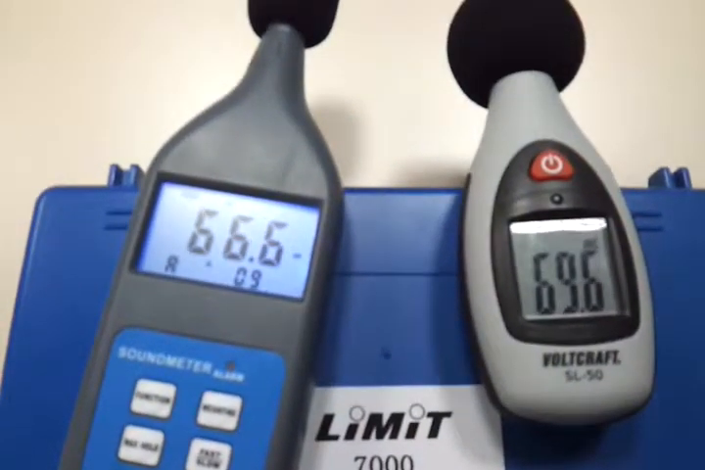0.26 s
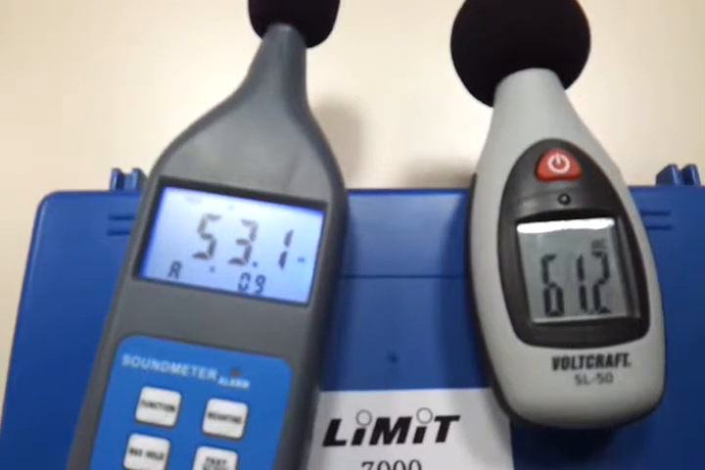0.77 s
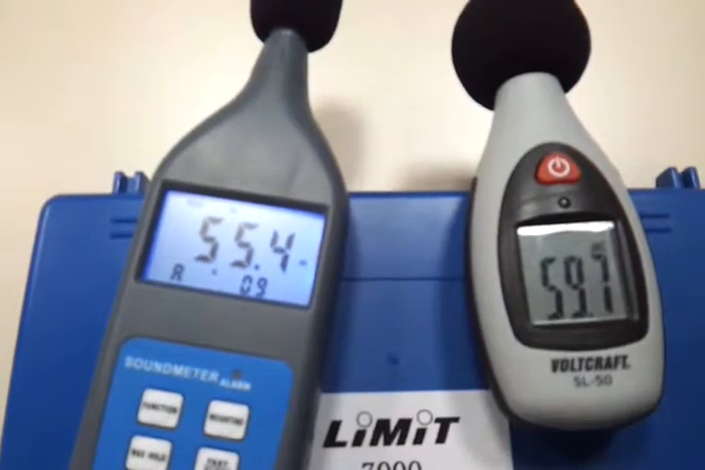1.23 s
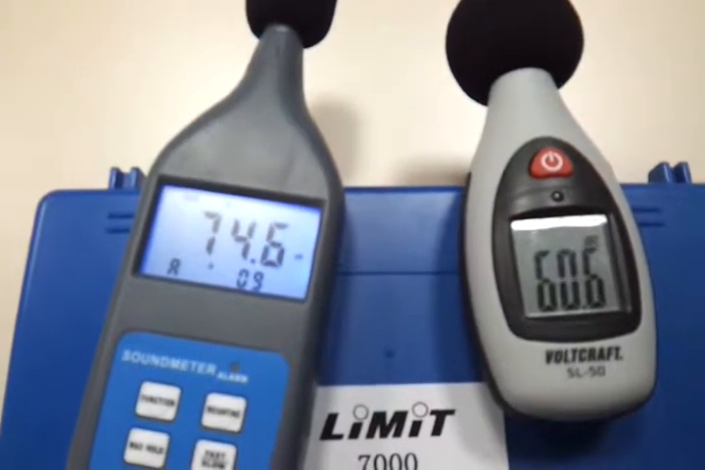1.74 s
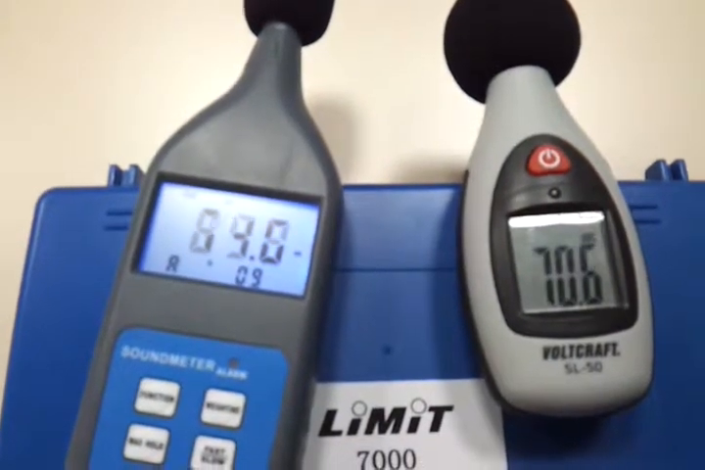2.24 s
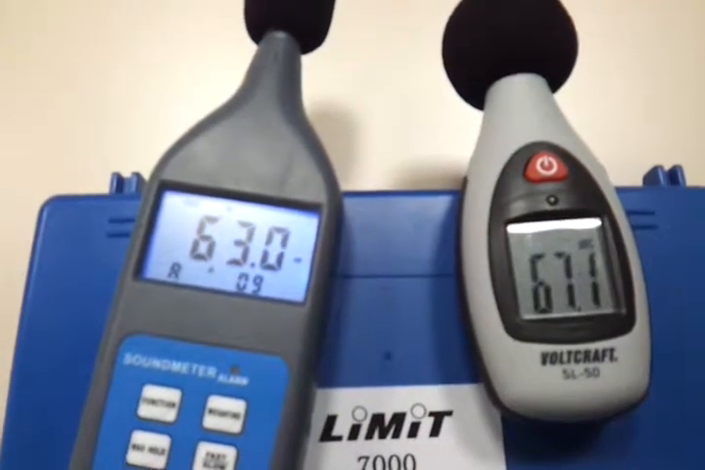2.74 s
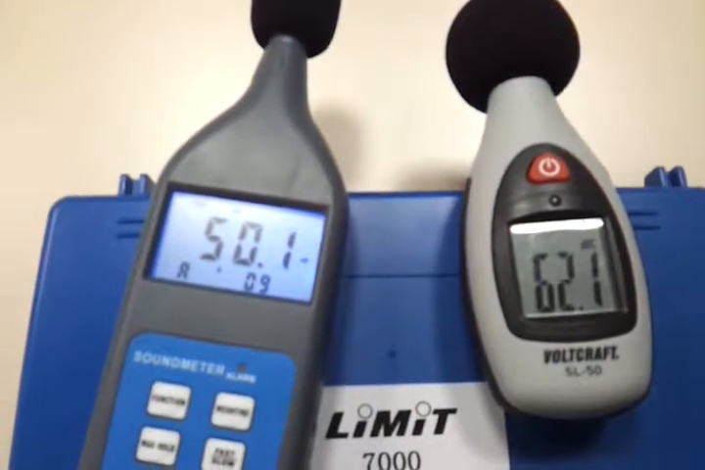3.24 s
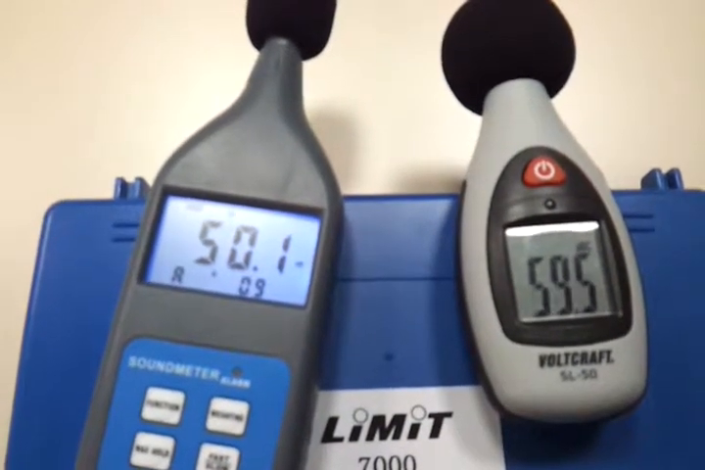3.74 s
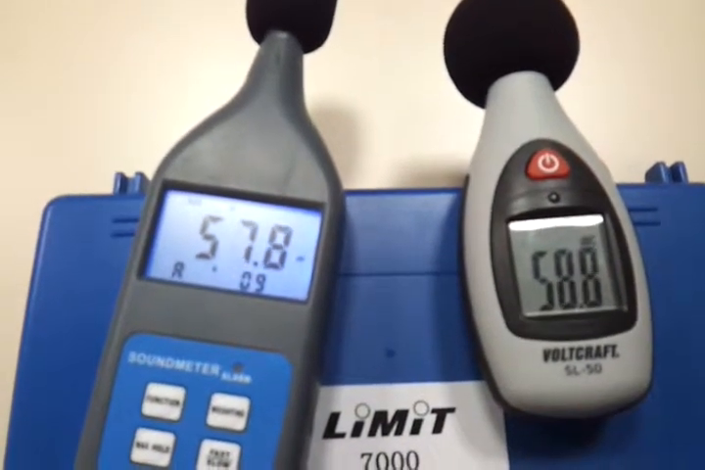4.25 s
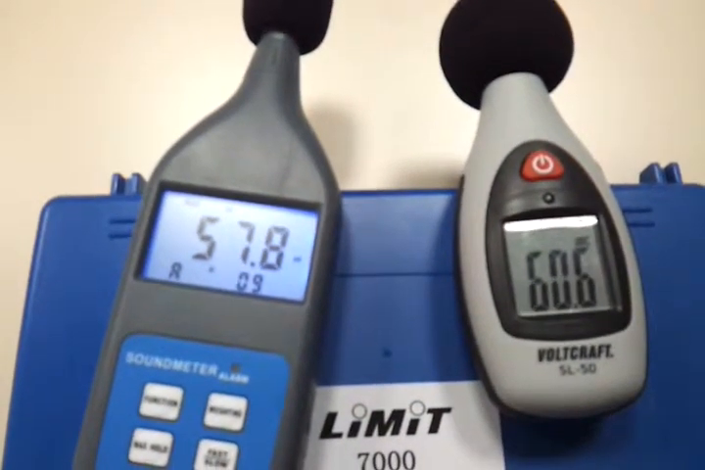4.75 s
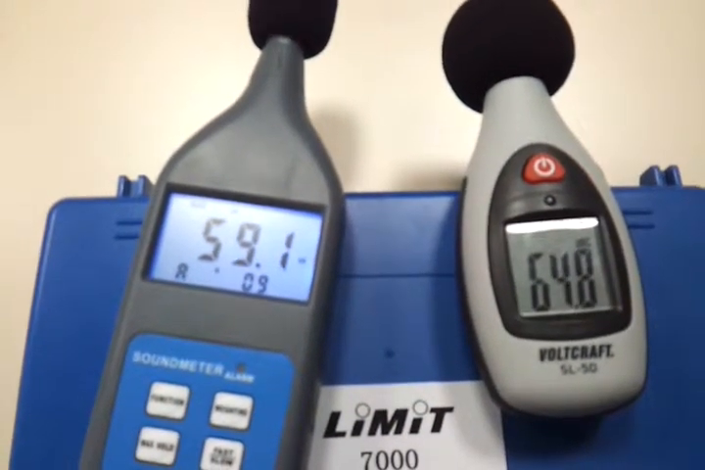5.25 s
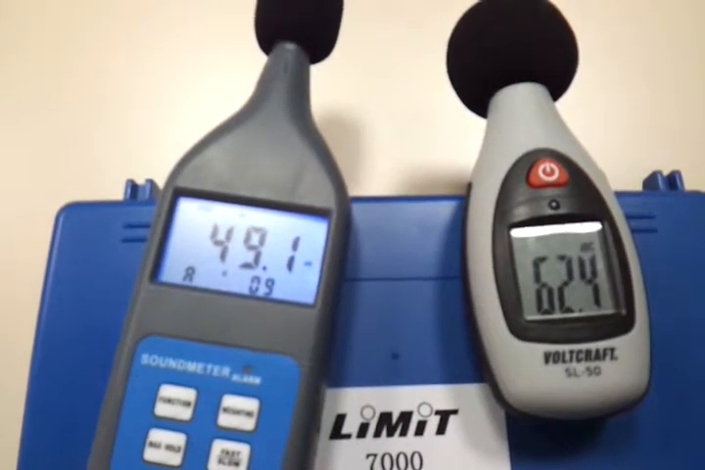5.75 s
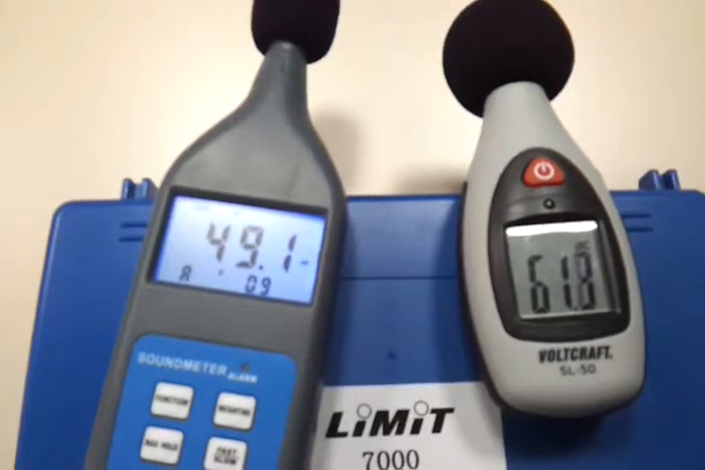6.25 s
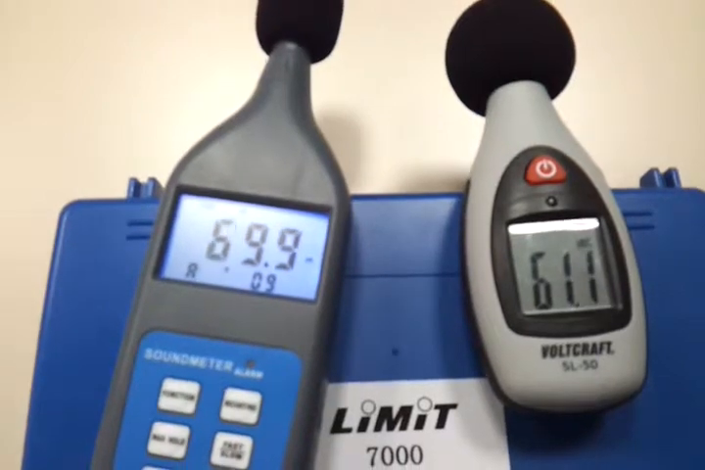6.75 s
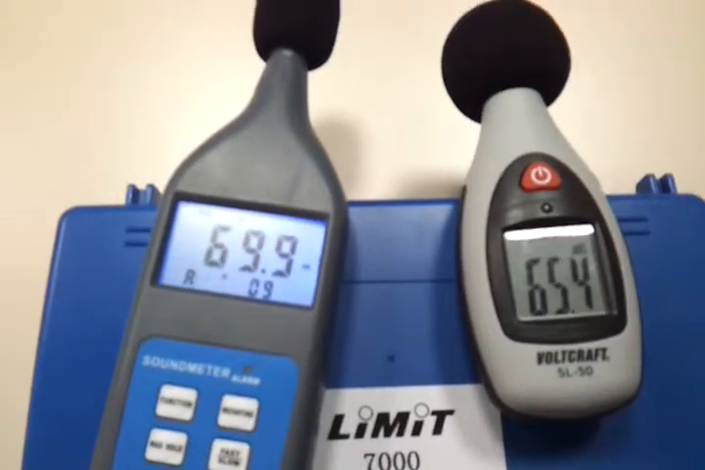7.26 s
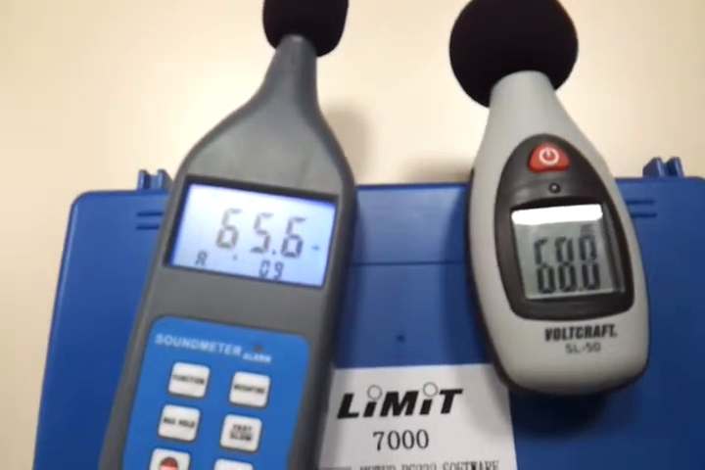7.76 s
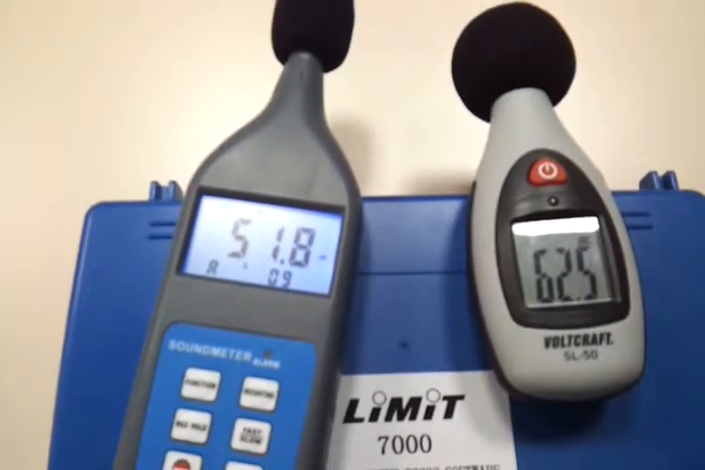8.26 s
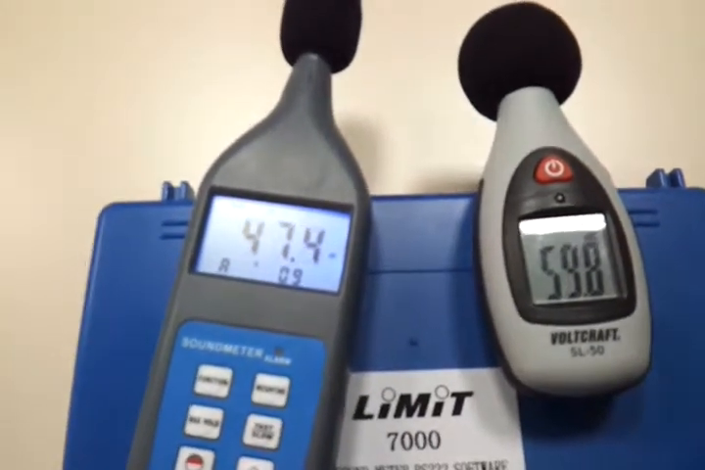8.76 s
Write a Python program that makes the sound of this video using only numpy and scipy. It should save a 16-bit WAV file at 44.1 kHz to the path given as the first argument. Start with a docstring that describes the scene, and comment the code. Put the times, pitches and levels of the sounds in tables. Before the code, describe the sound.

Short crackling rips of a paper sheet, sharp flicks and faint handling rustle, a couple of table knocks, over low steady indoor rumble.

```python
"""A small, lively room with a low, nearly steady rumble, where paper is ripped close by in four quick tears.
Tears are dense crackles of breaking fibres that also drive the rasp and flutter of the sheet.
Around them noise bursts make the sheet snap, and swells of grainy hiss make it rustle in the hands.
Before the last tear two knocks ring the table with decaying sines; taps, clicks and thumps are shaped noise.
The loudest peaks are rounded off a little."""
import sys
import numpy as np
from scipy import signal
from scipy.fft import rfft, irfft, next_fast_len
from scipy.io import wavfile
from scipy.ndimage import map_coordinates

SR = 44100
rng = np.random.default_rng(int(sys.argv[2]) if len(sys.argv) > 2 else 0)


def inscribe(sig):
    """Save sig as 16-bit PCM at rate SR to the path in sys.argv[1].

    A 1-D sig is mono; a 2-D sig holds one channel per row.
    Samples are clipped to [-1, 1] before scaling.
    """
    pcm = np.round(np.clip(np.atleast_2d(sig).T, -1, 1) * 32767)
    wavfile.write(sys.argv[1], SR, pcm.astype(np.int16))


N = 396900


def amp(db):
    """Decibels to gain."""
    return 10 ** (np.asarray(db) / 20)


def unit(x):
    """Scale to rms 1."""
    return x / np.sqrt(np.mean(x ** 2) + 1e-20)


def along(points, hz):
    """Interpolate (Hz, value) points on a log frequency axis."""
    f, v = np.transpose(points)
    return np.interp(np.log(hz + 1), np.log(f + 1), v)


def wobble(rate, n):
    """A smooth random curve, rate knots a second."""
    return map_coordinates(rng.standard_normal(int(n * rate / SR) + 4), [np.arange(n) * rate / SR])


def filtered(x, response):
    """Multiply the spectrum of x by a response of frequency."""
    n = x.shape[-1]
    m = next_fast_len(n + 8192)
    return irfft(rfft(x, m) * response(np.fft.rfftfreq(m, 1 / SR)), m)[..., :n]


def coloured(x, spectrum, size=2048):
    """Colour x with a minimum-phase filter of energy 1, so that sharp onsets stay sharp."""
    log_gain = np.log(amp(along(spectrum, np.fft.rfftfreq(size, 1 / SR))))
    # folding the cepstrum forward in time makes the filter causal
    cepstrum = irfft(log_gain)
    cepstrum[1:size // 2] *= 2
    cepstrum[size // 2 + 1:] = 0
    kernel = irfft(np.exp(rfft(cepstrum)))
    return signal.fftconvolve(x, kernel[None] / np.linalg.norm(kernel), axes=1)[:, :x.shape[1]]


# How alike the two microphones hear diffuse sound. Each row: frequency in Hz, left-right correlation.
LIKENESS = [(40, 0.88), (140, 0.9), (350, 0.79), (700, 0.74), (1200, -0.26), (2200, -0.19), (4000, 0.35),
            (12000, -0.17)]


def pair(n):
    """White noise at two spaced microphones: alike in the bass, only loosely related in the treble."""
    def turn(hz):
        return np.arccos(np.clip(along(LIKENESS, hz), -1, 1)) / 2

    def mid_side_gains(hz):
        return np.array([np.cos(turn(hz)), np.sin(turn(hz))])

    mid, side = filtered(rng.standard_normal((2, n)), mid_side_gains)
    return np.array([mid + side, mid - side])


def spaced(n, lead):
    """White noise from one direction: it reaches the left microphone lead seconds before the right."""
    ears = np.array([[1], [-1]])
    return filtered(rng.standard_normal(n), lambda hz: np.exp(1j * np.pi * hz * lead * ears))


def crackle(n, rate, spread_db, life):
    """Envelope of tiny uneven bursts at random moments, rate a second, each dying in life seconds."""
    struck = rng.random(n) < rate / SR
    sizes = amp(abs(spread_db) * np.minimum(rng.exponential(size=n), 4)) * struck
    energy = signal.lfilter([1], [1, -np.exp(-2 / (life * SR))], sizes ** 2)
    return unit(np.sqrt(energy))


def add(track, s, sound):
    """Mix a sound into the track at time s."""
    at = max(round(s * SR), 0)
    track[:, at:at + sound.shape[1]] += sound[:, :max(N - at, 0)]


# How hard each tear is pulled, one list a tear. Each row: time in seconds, relative level in dB.
PULLS = [
    [(1.165, -27), (1.235, -22.5), (1.277, -14.5), (1.399, -8), (1.477, -13), (1.63, -35)],
    [(1.655, -20), (1.681, -15), (1.709, -13.5), (1.803, -9), (1.84, -14)],
    [(3.93, -35.5), (3.982, -24.5), (4.19, -12.5), (4.194, -10.5), (4.242, -5.5), (4.306, -11.5),
     (4.385, -31.5)],
    [(6.885, -17.5), (6.907, -11), (6.959, -14.5), (7.075, -15), (7.099, -20), (7.153, -17.5), (7.28, -42)],
]
# How each sheet is held, one row a tear. Each row: left microphone's lead in seconds, left-right balance
# in dB, flutter resonance in Hz, pitch of the rasp as a ratio, rasp level in dB, flutter level in dB.
HOLDS = [(.00036, -1, 790, 0.895, 0, -12.5), (-.00034, 0.5, 1130, 0.94, -0.5, -13.5),
         (.0003, 0.5, 740, 0.833, -1.5, -21.5), (-.00018, -0.5, 510, 0.86, -7.5, -21.5)]
# Bright spectrum of parting fibres, also the crack of snaps and clicks. Each row: Hz, level in dB per Hz.
FIBRE_SPECTRUM = [(300, -38), (1500, -19), (2800, -11), (4000, -6.5), (5200, -3), (6100, 0), (6900, -2),
                  (7900, -2), (9500, -9.5), (11500, -11.5), (14500, -16)]
# Spectrum of the rasping sheet before its pitch ratio. Each row: frequency in Hz, level in dB per Hz.
SHEET_SPECTRUM = [(60, -40), (200, -11), (700, -5), (1300, -1), (1900, 1), (2700, 4), (3500, 1.5),
                  (4600, 2.5), (6500, 4.5), (9000, -22.5)]
HISS_DB = 3.5  # fibre hiss over the pull
RASP_GROWS, FLUTTER_GROWS = 0.99, 0.7  # dB for each dB of pull
RASP_FADE_DB, FLUTTER_FADE_DB = 11, 15.5  # lost from start to end of a tear
RELEASE_S = 0.021  # decay as the last fibres part


def tears():
    """Fibres break by the thousand; the same jerks make the sheet rasp and flutter, fading through each tear."""
    track = np.zeros((2, N))
    for rows, (lead, pan_db, hz, pitch, rasp_db, flutter_db) in zip(PULLS, HOLDS):
        start, end = rows[0][0], rows[-1][0]
        t = np.arange(start, end + .15, 1 / SR)
        n = len(t)
        pull_db = np.interp(t, *np.transpose(rows))
        torn = (t - start) / (end - start)
        release = np.exp(-np.maximum(t - end, 0) / RELEASE_S)
        hiss = release * amp(HISS_DB + pull_db)
        rasp = release * amp(rasp_db + RASP_GROWS * pull_db - RASP_FADE_DB * torn)
        flutter = release * amp(flutter_db + FLUTTER_GROWS * pull_db - FLUTTER_FADE_DB * torn)
        grain = spaced(n, lead) + amp(-0.5) * pair(n)
        breaks = unit(grain * crackle(n, rate=3300, spread_db=0.5, life=0.00029))
        # the tear front sticks and jumps; the larger jumps drive the sheet
        jumps = unit(amp(-14) + crackle(n, rate=350, spread_db=0.5, life=0.0022))
        sound = coloured(breaks * hiss * amp(0.52 * wobble(61, n)), FIBRE_SPECTRUM)
        sound += coloured(breaks * jumps * rasp, np.multiply(SHEET_SPECTRUM, [pitch, 1]))
        # the loose halves flap unevenly, so the low part comes in lumps
        lumps = unit(amp(4 * np.tanh(wobble(45, n))))
        panel = [(hz / 6, -22), (hz / 2, -5), (hz, 0), (hz * 2, -5), (hz * 5, -22)]
        sound += coloured(breaks * flutter * lumps, panel)
        balanced = sound * amp([[pan_db / 2], [-pan_db / 2]])
        # silence at the end leaves space for the room to ring
        padded = np.pad(balanced, ((0, 0), (0, SR // 2)))
        add(track, start, amp(-2.5) * room(padded, wet_db=-5, early_db=-1.5))
    return track


# The sheet buckles or is flicked. Each row: start in seconds, relative level in dB,
# hollow flap in dB relative to the crack (before a common trim), left-right balance in dB.
SHEET_SNAPS = [(0.0084, -14, -1, -2.5), (0.6134, -8, -11, 1), (0.6231, -21.5, 9.5, 1),
               (1.0926, -6.5, 0.5, -2.5), (1.1157, -2.5, -30, -5), (1.1496, -1, -14, 0),
               (1.653, -7.5, -13, 0), (1.6755, 4, -8, 7), (1.8443, -2.5, -17, 6), (2.17, -24.5, 2.5, 1.5),
               (2.234, -20.5, -8.5, -5), (2.4522, -23.5, -20, -9), (2.5718, -22.5, -2.5, 4),
               (2.7153, -18, -8, 2), (2.7552, -22, -1, -3), (3.1532, -22, 1.5, 1), (3.7757, -10, -25, 1.5),
               (3.7949, -10.5, 2.5, 1.5), (3.807, -8, -34, 0), (3.905, -19, -20, -8), (4.1924, 6, -17, 1),
               (4.7912, -26, -14, 6), (4.8787, -21.5, -10, -4), (6.172, -21, -13, 5), (6.268, -21, -20, 2),
               (6.3005, -19, -20, 5), (6.554, -9, -21, -4), (6.8911, 0, -20, 6), (6.9052, 6.5, -28, 3)]
# Hollow voice of the flapping sheet, also the body of clicks. Each row: Hz, level in dB per Hz.
FLAP_SPECTRUM = [(150, -20), (550, -5), (1100, -6), (1500, -7), (2200, 2), (3200, -2), (4500, -5),
                 (6500, -15), (12000, -35)]
SNAP_T60_S = 0.011


def snaps():
    """A buckle flips in milliseconds: a sharp crack and the hollow flap of the sheet, each balanced anew."""
    track, t = np.zeros((2, N)), np.arange(SR // 3) / SR
    for s, db, flap_db, pan_db in SHEET_SNAPS:
        # the flip keeps its full strength for a moment, then dies
        burst = pair(len(t)) * amp(-60 * np.maximum(t - .0007, 0) / SNAP_T60_S)
        crack = coloured(burst, FIBRE_SPECTRUM)
        flap = amp(flap_db - 2.5) * coloured(burst, FLAP_SPECTRUM)
        balance = amp([[pan_db / 2], [-pan_db / 2]])
        add(track, s, amp(db - 3) * balance * room(crack + flap, wet_db=-4, early_db=-9.5))
    return track


# A sheet slides in the hands; the short row at 1.15 s is instead the first rough rip as the first tear starts.
# Each row: fastest moment in seconds, relative level in dB, length in seconds.
HAND_SLIDES = [(-0.002, -32.5, 0.33), (0.55, -39, 0.14), (0.714, -32, 0.29), (1.064, -32.5, 0.14),
               (1.15, -23, .05), (2.245, -38.5, 0.096), (2.53, -37, 0.27), (2.838, -37, 0.25),
               (3.2, -34.5, 0.28), (3.331, -28.5, 0.048), (3.596, -35.5, 0.16), (3.85, -29, 0.21),
               (4.938, -30, 0.08), (5.13, -38, 0.29), (5.545, -35.5, .06), (5.7, -39, 0.2),
               (6.13, -32.5, 0.32), (6.365, -32, 0.079), (6.64, -22, 0.06), (6.88, -19.5, 0.086),
               (8.08, -38, 0.084), (8.39, -38, 0.19), (8.805, -46, .3), (8.934, -32, 0.016)]
# Spectrum of sliding paper. Each row: frequency in Hz, level in dB per Hz.
RUSTLE_SPECTRUM = [(300, -12.5), (1400, -12.5), (2200, -11.5), (3100, -11), (4500, -7.5), (6200, -2),
                   (8200, -5), (9500, -11), (12000, -14), (14500, -21.5)]
HOLD_DB = -43  # faint rustle of paper that is merely held, on the scale of the slides
STILL_S, STILL_LENGTH_S = 7.5, 0.2  # the hands rest after the last tear


def rustle():
    """Paper slides over paper and skin: soft hiss with sparse crinkles, swelling with each move of the hands."""
    t = np.arange(N) / SR

    def bell(s, length):
        return np.exp(-(2 * (t - s) / length) ** 2)

    held = amp(HOLD_DB) * (1 - bell(STILL_S, STILL_LENGTH_S))
    moves = sum(amp(db) ** 2 * bell(s, length) for s, db, length in HAND_SLIDES)
    level = np.sqrt(held ** 2 + moves)
    crinkles = crackle(N, rate=160, spread_db=3.5, life=0.0034)
    grain = pair(N) * (amp(-3.5) + amp(-10.5) * crinkles)
    flicker = amp(1.5 * wobble(22, N))
    return level * flicker * coloured(grain, RUSTLE_SPECTRUM)


# Knocks on the table. Each row: start in seconds, relative level in dB.
TABLE_KNOCKS = [(6.4602, -11), (6.8104, -16.5)]
# What the table rings with. Each row: frequency in Hz, relative level in dB, 60 dB decay time in seconds.
TABLE_MODES = [(270.6, 0.5, 0.27), (298, 2.5, 0.17), (348.4, -2.5, 0.31), (538, 1.5, 0.23), (583, -3, 0.28),
               (1030, -21, .3), (1205, -8, 0.19), (1222, -19.5, 2.7), (1450, -8, 0.19), (1700, -5, 0.52),
               (1820, -4, 0.35), (1970, -3, 0.28), (2210, -16, 0.3), (2700, -15, .24), (2980, -6, .24)]
# Dull body of the blow. Each row: frequency in Hz, level in dB per Hz.
THUD_SPECTRUM = [(40, -24), (95, -8), (190, -4), (280, 4), (420, -14.5), (550, -9.5), (800, -5), (1250, 1),
                 (1500, -4), (2200, 1), (3100, -2.5), (4300, -13), (7000, -13), (14000, -47)]


def knocks():
    """A dull blow sets the table and the things on it ringing, slightly unsteadily."""
    n = SR * 3 // 2
    track, t = np.zeros((2, N)), np.arange(n) / SR
    for s, db in TABLE_KNOCKS:
        ring = np.zeros((2, n))
        for hz, level_db, t60 in TABLE_MODES:
            delay = rng.uniform(0, 0.00035, (2, 1))  # s, one for each microphone
            phase = 2 * np.pi * (hz * (t - delay) + rng.random())
            # a phase wobble that calms down
            buzz = .8 * wobble(70, n) * np.exp(-t / .25)
            ring += amp(level_db - 60 * t / t60) * np.sin(phase + buzz)
        thud = coloured(pair(n) * amp(-60 * t / 0.17), THUD_SPECTRUM)
        onset = 1 - np.exp(-t / 0.00055)
        add(track, s, amp(db) * (amp(-11.5) * ring + amp(3.5) * thud) * onset)
    return track


# Light taps of fingers and paper on the table. Each row: start in seconds, relative level in dB,
# centre frequency in Hz, 60 dB decay time in seconds.
TABLE_TAPS = [(0.625, -12.5, 3530, 0.056), (0.922, -25, 1910, 0.14), (0.945, -26, 1690, 0.22),
              (1.013, -21.5, 7360, 0.12), (1.058, -14.5, 2070, 0.021), (2.734, -29, 2100, 0.12),
              (7.63, -17.5, 4530, 0.036), (7.739, -18.5, 2620, 0.017), (7.746, -8.5, 3340, 0.017),
              (8.055, -24.5, 1630, 0.18), (8.265, -20, 4900, 0.095)]


def taps():
    """Soft contacts: short puffs of noise around one broad resonance."""
    track, t = np.zeros((2, N)), np.arange(SR // 10) / SR
    for s, db, hz, t60 in TABLE_TAPS:
        puff = pair(len(t)) * amp(-60 * t / t60) * (1 - np.exp(-t / 0.0008))
        resonance = [(hz / 12, -12), (hz / 4, -5), (hz * 0.4, -8), (hz, 0), (hz * 1.72, -9), (hz * 3, -24)]
        add(track, s, amp(db - 4.5) * coloured(puff, resonance))
    return track


# Small dry clicks close by. Each row: start in seconds, relative level in dB,
# hollow body in dB relative to the crack.
NEAR_CLICKS = [(8.572, -20.5, -19), (8.916, -7, -3), (8.979, -24, -15)]


def clicks():
    """Hard little contacts, over in a few milliseconds and too near for the room to matter."""
    track, t = np.zeros((2, N)), np.arange(SR // 20) / SR
    for s, db, body_db in NEAR_CLICKS:
        burst = pair(len(t)) * amp(-60 * t / 0.007)
        crack = coloured(burst, FIBRE_SPECTRUM)
        body = amp(body_db) * coloured(burst, FLAP_SPECTRUM)
        add(track, s, amp(db - 0.5) * (crack + body))
    return track


# Soft thumps through the table. Each row: start in seconds, level in dB, 60 dB decay time in seconds.
SOFT_BUMPS = [(4.879, -42, 0.64), (6.469, -37, 1.4), (6.821, -36, 1.5), (8.91, -33, 0.3)]


def bumps():
    """Deep, toneless thumps: decaying noise with nearly all its weight in the lowest bass."""
    track, t = np.zeros((2, N)), np.arange(SR) / SR
    deep = [(15, -7), (36, -3), (70, -16.5), (150, -21), (500, -38), (2000, -74)]
    for s, db, t60 in SOFT_BUMPS:
        push = pair(len(t)) * amp(-60 * t / t60) * (1 - np.exp(-t / .005))
        add(track, s, amp(db) * coloured(push, deep, size=8192))
    return track


# The rumble swells a little. Each row: time in seconds, relative level in dB.
RUMBLE_SWELL = [(0, -42), (1, -40), (3.6, -41), (4.4, -40), (6.5, -39.5), (8.3, -42.5), (9, -38)]
# Spectrum of the rumble. Each row: frequency in Hz, level in dB per Hz.
RUMBLE_SPECTRUM = [(15, -29.5), (25, -13), (59, -16), (94, -5), (149, -4), (222, -8.5), (245, -8),
                   (279, -10), (314, -13.5), (437, -16.5), (498, -17.5), (832, -20.5), (965, -26.5),
                   (1050, -23), (1300, -25.5), (1690, -77.5), (2860, -120)]
# Low room resonances that the rumble keeps alive. Each row: centre in Hz, width in Hz, relative level in dB.
ROOM_BOOMS = [(85, 8.2, -8.5), (110, 16, -5.5), (145.1, 4.1, 2.5), (166.6, 16, -2.5), (220, 17.4, -2.5)]
# Spectrum of the faint hiss. Each row: frequency in Hz, level in dB per Hz.
AIR_SPECTRUM = [(500, -15.5), (1200, 0.5), (2500, -3.5), (6300, -6), (10000, -6), (14500, -9)]


def background():
    """A rumble, as of ventilation, booming in the room's low resonances, under a faint hiss."""
    swell = amp(np.interp(np.arange(N) / SR, *np.transpose(RUMBLE_SWELL)))

    def resonances(f):
        total = 0
        for k, (centre, width, db) in enumerate(ROOM_BOOMS):
            band = 1j * f * width / (centre * centre - f * f + 1j * f * width)
            total = total + amp(db) * band * (-1) ** k  # neighbours alternate in sign
        return total

    booms = unit(filtered(pair(N), resonances))
    low = unit(coloured(pair(N), RUMBLE_SPECTRUM)) + amp(-3.0) * booms
    balance = amp([[.9], [-.9]])  # a little to the left
    return swell * low * balance + amp(-50) * coloured(pair(N), AIR_SPECTRUM)


# How fast the room dies away. Each row: frequency in Hz, 60 dB decay time in seconds.
ROOM_DECAY = [(150, 0.78), (700, 0.64), (2000, 0.64), (6000, 0.48), (13000, 0.19)]


def room(x, wet_db, early_db):
    """The table and near walls answer within some milliseconds, then the room dies away, treble first."""
    hz, t, z = signal.stft(pair(SR * 3 // 4), SR, nperseg=256)
    decay = amp(-60 * t / along(ROOM_DECAY, hz)[:, None])
    tail = signal.istft(z * decay, SR, nperseg=256)[1]
    t = np.arange(tail.shape[1]) / SR
    tail = tail * (1 - np.exp(-(t / 0.003) ** 2))
    # sparse early reflections, 700 a second, starting after a millisecond
    hits = rng.standard_normal(tail.shape) * (rng.random(tail.shape) < 700 / SR)
    walls = hits * (t > .001) * np.exp(-t / 0.0034)
    answer = (amp(wet_db) * unit(tail) + amp(early_db) * unit(walls)) / np.sqrt(len(t))
    return x + signal.fftconvolve(x, answer, axes=1)[:, :x.shape[1]]


def scene():
    """Torn and handled paper, the table and the rumble, mixed together."""
    sliding = amp(-1.5) * room(rustle(), wet_db=-10.5, early_db=-4.0)
    table = room(taps(), wet_db=-9.5, early_db=-11.5) + room(knocks(), wet_db=-3.5, early_db=-8)
    return tears() + sliding + snaps() + table + clicks() + bumps() + background()


TOP_HZ = 14600  # band limit


def record(dry):
    """The loudest peaks are rounded off near full scale, then a steep filter cuts above the band limit."""
    rounded = dry / (1 + np.abs(dry / 1.15) ** 6) ** (1 / 6)
    return filtered(rounded, lambda hz: 1 / (1 + (hz / TOP_HZ) ** 200))


dry = scene()
out = record(dry)
inscribe(out)
```